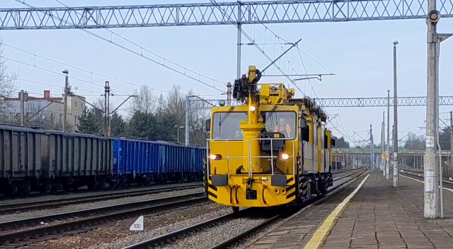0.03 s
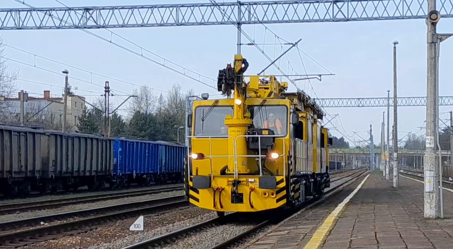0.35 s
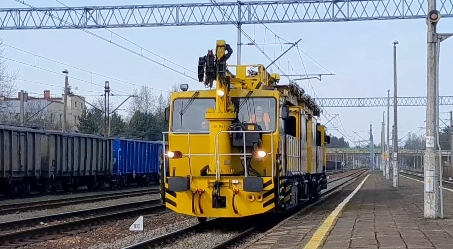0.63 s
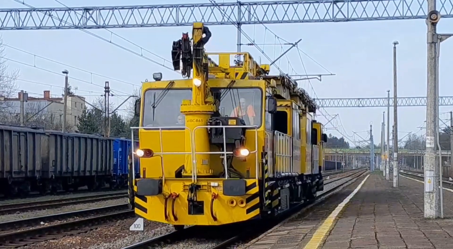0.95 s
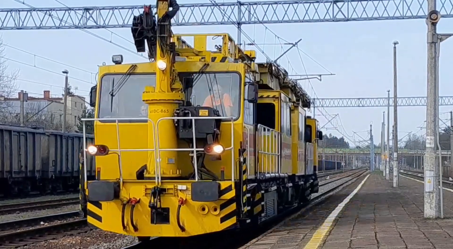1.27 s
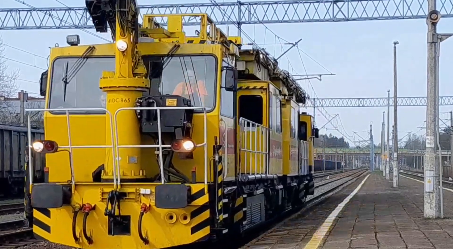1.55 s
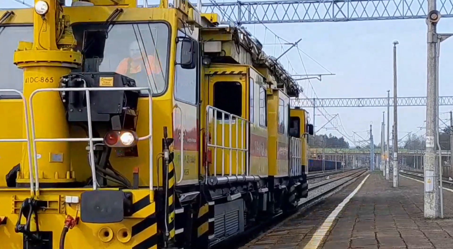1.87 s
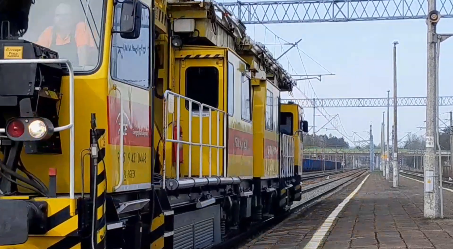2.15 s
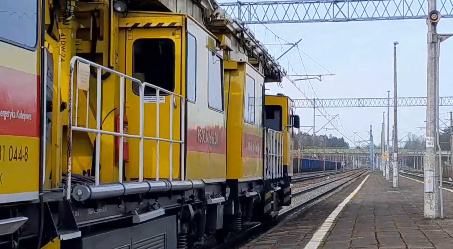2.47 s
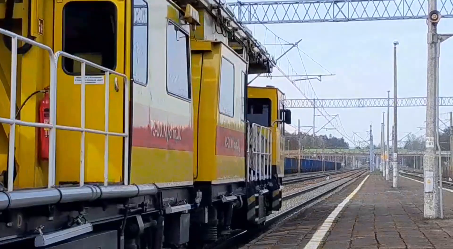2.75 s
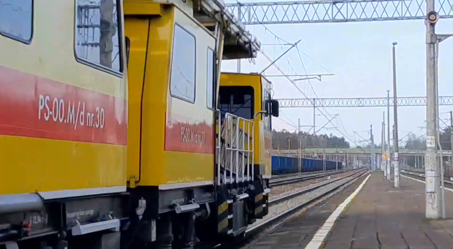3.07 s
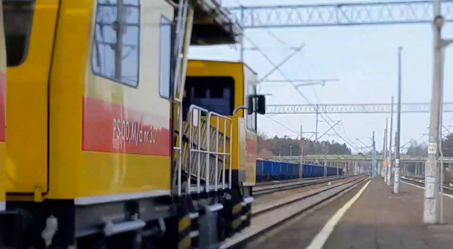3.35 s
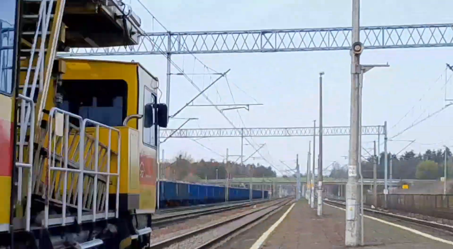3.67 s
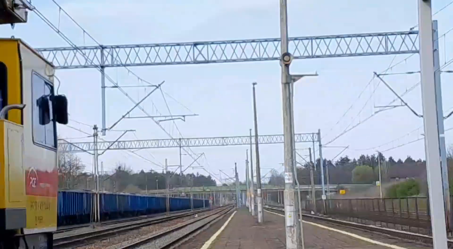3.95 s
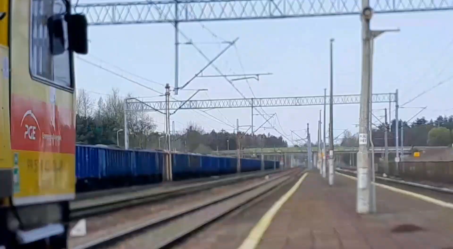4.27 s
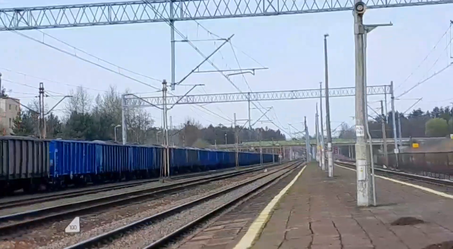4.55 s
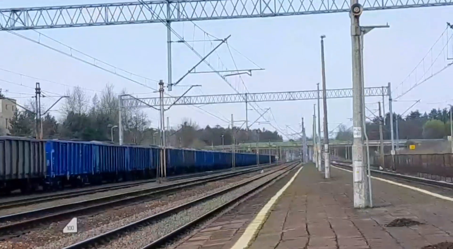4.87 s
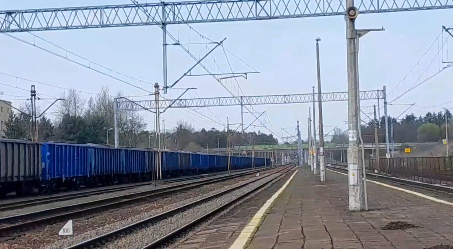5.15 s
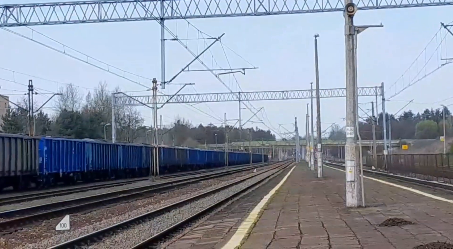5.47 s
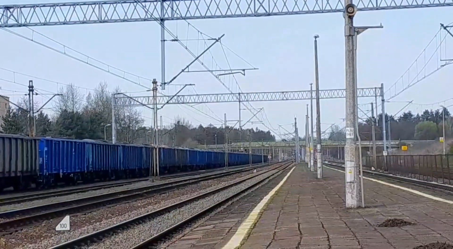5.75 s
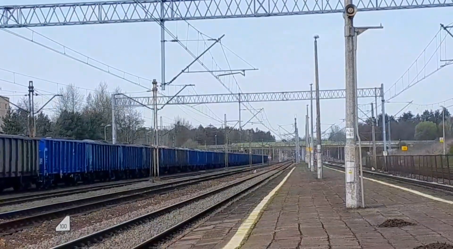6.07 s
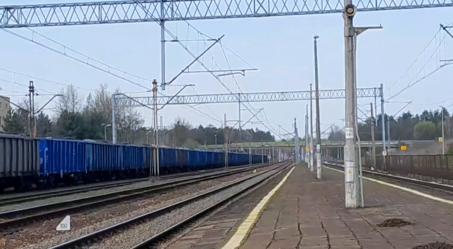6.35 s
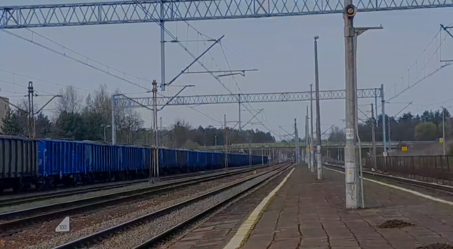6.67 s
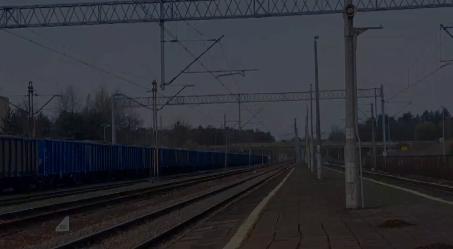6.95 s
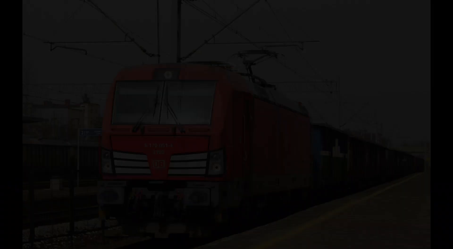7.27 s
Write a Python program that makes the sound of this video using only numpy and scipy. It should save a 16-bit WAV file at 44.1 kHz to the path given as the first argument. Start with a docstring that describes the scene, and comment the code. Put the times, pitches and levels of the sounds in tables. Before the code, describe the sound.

Heard from a platform in a light breeze, a small diesel rail vehicle rolls closer with a low drone, steel hiss and regular wheel thuds. The sound swells as it goes by a few metres away, rattling and scraping, and dragged air thumps against the microphone. Its rear wheels clank and ring sharply, falling in pitch. Softer clanks, engine drone and gusts continue until the sound cuts off.

```python
"""Station platform, a stereo microphone 4.67 m from the track, a light breeze. A diesel rail maintenance
vehicle approaches, its engine droning over the rumble and hiss of steel on steel; worn treads clank and
thump at every turn. The noise swells as the front axle passes at 2.7 s, a flange rubs, and the slipstream
buffets the microphone ports. The rear axle follows at 4.7 s, its wheels ringing and dropping in pitch.
The vehicle rolls on, engine still droning, until the sound stops abruptly at 7.2 s."""
import sys
import numpy as np
from scipy import signal
from scipy.fft import rfft, irfft, next_fast_len
from scipy.io import wavfile
from scipy.ndimage import uniform_filter1d, map_coordinates

SR = 44100
rng = np.random.default_rng(int(sys.argv[2]) if len(sys.argv) > 2 else 0)


def log_audio(samples):
    """Write samples as a 16-bit WAV file to the path given in sys.argv[1]."""
    # one column per channel
    frames = np.atleast_2d(samples).T
    # limit to full scale, then quantise
    limited = np.clip(frames, -1, 1)
    pcm = np.round(limited * 32767).astype(np.int16)
    wavfile.write(sys.argv[1], SR, pcm)


N = 326781

SPEED_M_PER_S, DISTANCE_M = 6.73, 4.67  # of the vehicle; from the microphone to the track
FRONT_S, REAR_S = 2.71, 4.73  # each axle is level with the microphone

# Levels in all tables are relative.
# A worn patch of tread meets the rail about once per turn, and often lands again more softly:
# t/s, scrape level/dB, clank level/dB, ring level/dB, ring centre f/Hz, ring t60/s
TREAD_HITS = [(0.494, -41, -35.5, -45, 2360, 0.54), (1.062, -33, -32, -41, 2300, 0.39),
              (1.135, -36, -30, -47, 2900, 0.33), (1.578, -35.5, -38, -44, 3480, 0.5),
              (1.686, -34.5, -28.5, -36, 3580, 0.12), (1.749, -48, -33, -46, 1750, .1),
              (1.83, -29.5, -33, -43.5, 4200, 0.47), (2.307, -26.5, -33, -45, 4870, .3),
              (2.37, -30, -27.5, -36.5, 4270, 0.15), (2.524, -40.5, -27, -27, 1730, 0.09),
              (2.781, -47, -36, -29.5, 1660, 0.12), (4.508, -21, -27.5, -40, 3300, 0.16),
              (4.593, -26, -44, -44, 3400, 0.1), (4.768, -14.5, -23.5, -22.5, 3600, 0.18),
              (4.85, -23.5, -24, -33.5, 3200, 0.64), (5.031, -12.5, -22, -22.5, 2900, 0.31),
              (5.1, -25.5, -33, -30, 2370, 0.54), (5.135, -27, -32, -32, 5100, 0.2),
              (5.171, -35, -45.5, -22.5, 3270, 0.077), (5.301, -16, -23, -28.5, 3580, 0.49),
              (5.389, -24.5, -28.5, -29.5, 4200, 0.33), (5.528, -39, -44, -40, 3318, 0.34),
              (5.577, -18, -25, -43, 5705, 0.56), (5.662, -29.5, -34, -37.5, 5400, 0.27),
              (5.859, -27.5, -29.5, -40.5, 5500, 0.46), (6.015, -42, -48, -39.5, 5230, 0.13),
              (6.135, -31.5, -32.5, -41, 3260, 0.33), (6.225, -35, -34, -51, 5200, 0.27),
              (6.411, -30.5, -33.5, -39, 5440, 0.27), (6.508, -39.5, -40, -50, 5040, 0.27),
              (6.683, -35, -32.5, -41, 1870, 0.41), (6.962, -31, -32, -42, 1990, 0.6)]
SNAP_SPECTRUM = [(900, -15.5), (1800, 2.5), (3000, -0.5), (6300, -1.5), (7500, -10.5), (12000, -14),
                 (15800, -16)]  # loose fittings and grit: f/Hz, level/dB
# How alike the two microphone ports hear a noise: f/Hz, left-right correlation
GENERAL_LIKENESS = [(30, 0.56), (80, 0.99), (200, 0.98), (450, 1), (1000, 0.46), (2500, 0.44), (6000, 0),
                    (15000, 0.1)]  # rolling noise, ticks and background
WIDE_LIKENESS = [(900, 0.55), (2500, 0.18), (5000, 0), (15000, 0)]  # airy hiss and flange scrape: the treble is unrelated in the two ports
NEAR_LIKENESS = [(60, 0.73), (400, 0.71), (3000, 0.76), (12000, 0.38)]  # the near wheels
WIND_LIKENESS = [(60, 0.18), (400, 0.0047)]  # air striking the ports


def amp(db):
    """Decibels to gain."""
    return 10 ** (np.asarray(db) / 20)


def unit(x):
    """Scale to rms 1."""
    return x / np.sqrt(np.mean(x ** 2) + 1e-20)


def clock():
    """The time of every sample, in seconds."""
    return np.arange(N) / SR


def at_frequency(points, hz):
    """Read rows of f/Hz, value on a log frequency axis."""
    point_hz, values = np.transpose(points)
    return np.interp(np.log(hz + 1), np.log(point_hz + 1), values)


def curves(rows):
    """One value per sample for each column after the time."""
    times, *columns = np.transpose(rows)
    return [np.interp(clock(), times, column) for column in columns]


def wobble(rate, oversample=6):
    """A smooth random curve with rate knots a second."""
    count = int(N * rate / SR) + 4
    fine = signal.resample(rng.standard_normal(count), count * oversample)
    return np.interp(clock() * rate * oversample, np.arange(len(fine)), fine)


def filtered(x, response):
    """Filter x by a gain given as a function of frequency."""
    size = next_fast_len(N + SR // 4)
    return irfft(rfft(x, size) * response(np.fft.rfftfreq(size, 1 / SR)), size)[..., :N]


def rush(spectrum, likeness, drive=1):
    """Stereo noise of rms 1, its strength varied by drive before the spectrum colours it."""
    def response(hz):
        spread = np.arccos(np.clip(at_frequency(likeness, hz), -1, 1)) / 2
        outside = np.maximum(np.maximum(spectrum[0][0] / (hz + 1), hz / spectrum[-1][0]), 1)
        return amp(at_frequency(spectrum, hz)) / outside ** 4 * [np.cos(spread), np.sin(spread)]
    mid, side = filtered(rng.standard_normal((2, N)) * drive, response)
    return unit(np.array([mid + side, mid - side]))


def patchy(x, depth_db, size=1024):
    """Narrow bands swell and fade at random, as different modes of the metal are excited."""
    bands = signal.stft(x, nperseg=size)[2]
    field = uniform_filter1d(rng.standard_normal(bands.shape[1:]), size=3, axis=0)
    field = uniform_filter1d(field, size=12, axis=1)
    return unit(signal.istft(bands * amp(depth_db * unit(field)), nperseg=size)[1][:, :N])


def singing(modes):
    """Noise of rms 1 in narrow resonances, mostly alike in both ports."""
    def response(f):
        return np.sqrt(sum(amp(db) ** 2 / (1 + ((f - hz) / width) ** 2) ** 2 for hz, width, db in modes))
    drive = rng.standard_normal(N) + 0.57 * rng.standard_normal((2, N))
    return unit(filtered(drive, response))


def blow(t, db, t60, attack_s):
    """The envelope of one blow, which rises quickly and dies away."""
    return amp(db - 60 * t / t60) * (1 - np.exp(-t / attack_s))


def bursts(times, levels_db, t60, attack_s):
    """The joint envelope of many blows, added in power."""
    power, t = np.zeros(N + SR), np.arange(SR) / SR
    for s, db, decay_s in zip(times, levels_db, np.broadcast_to(t60, len(times))):
        power[max(round(s * SR), 0):][:SR] += blow(t, db, decay_s, attack_s) ** 2
    return np.sqrt(power[:N])


def swells(rows):
    """The joint envelope of bell-shaped swells."""
    return np.sqrt(sum(amp(db) ** 2 * np.exp(-((clock() - s) / half_s) ** 2) for s, half_s, db in rows))


def passed(middle_s=3.9, turn_s=0.5):
    """Rises from 0 to 1 around middle_s, by default as the middle of the vehicle goes by."""
    return (1 + np.tanh((clock() - middle_s) / turn_s)) / 2


def going_by(pass_s, db, coming_db, leaving_db):
    """Gain of a passing source: db when nearest, less coming_db or leaving_db per doubled distance."""
    along_m = SPEED_M_PER_S * (clock() - pass_s)
    doublings = np.log2(np.hypot(along_m, DISTANCE_M) / DISTANCE_M)
    return amp(db - doublings * np.where(along_m < 0, coming_db, leaving_db))


def both_axles(front_db, rear_db, coming_db, leaving_db):
    """Joint gain of a noise that both axles make as they go by."""
    return np.hypot(going_by(FRONT_S, front_db, coming_db, leaving_db),
                    going_by(REAR_S, rear_db, coming_db, leaving_db))


def placed(pair, lead_ms):
    """Give a sound its bearing: it reaches the left port lead_ms before the right."""
    shift = lead_ms * SR / 2000
    return np.array([map_coordinates(x, [np.arange(N) + way * shift], order=3)
                     for x, way in zip(pair, (1, -1))])


def station(level_db=-48):
    """The steady, distant background of the open station."""
    spectrum = [(40, -1.5), (200, -5.5), (1800, -7), (2800, -14.5), (5000, -14), (7500, -20.5),
                (15000, -35)]  # f/Hz, level/dB
    return amp(level_db) * rush(spectrum, GENERAL_LIKENESS)


def engine(level_db=-2.0, flutter_db=2, jitter=0.0069, throb_db=2.5):
    """Slightly unsteady exhaust partials, whose balance changes from front to rear."""
    firing = [(0, 38.37), (2.7, 38.97), (3.6, 37.87), (4.3, 37.93), (4.8, 37.02), (5.3, 35.83), (6, 36.17),
              (7.2, 35.95)]  # firing rate, lowered by the Doppler shift as it passes: t/s, f/Hz
    drone = [(0, -48.5), (1.1, -43), (2.0, -32), (2.6, -28), (3.4, -27), (4.1, -29.5), (5.2, -28.5),
             (5.8, -29), (6.5, -27.5), (6.97, -21.5), (7.2, -19.5)]  # the engine at the microphone: t/s, level/dB
    partials = [(2, 3.5, -3), (3, -0.5, -11), (4, -20, -15), (5.27, -19, -10), (6, -38, -19.5),
                (8.66, -4.5, -32), (11.3, -32, -24), (12.3, -8.5, -26)]  # multiple of the firing rate, level/dB approaching, level/dB leaving
    (firing_hz,), (drone_db,), gone = curves(firing), curves(drone), passed()
    phase = 2 * np.pi * np.cumsum(firing_hz * (1 + jitter * wobble(14))) / SR
    tone = np.zeros(N)
    for multiple, front_db, rear_db in partials:
        gain = amp(front_db + (rear_db - front_db) * gone + flutter_db * wobble(13))
        tone += gain * np.sin(multiple * phase + 0.16 * wobble(31))
    return amp(drone_db + level_db + throb_db * wobble(7)) * unit(tone)


def rolling(airy_peak_s=4.63):
    """Rough steel on steel shakes the chassis, roars in the wheels and hisses along the rail."""
    rumble_ahead = [(18, -64), (30, -42), (52, -6), (70, -1), (86, -2.5), (102, -1.5), (188, -7), (237, -9),
                    (278, -13.5), (330, -9), (430, -35.5), (730, -120)]  # chassis, heard from ahead: f/Hz, level/dB
    rumble_behind = [(18, -51), (30, -40), (53, -9.5), (70, -3), (82, -10), (97, -10.5), (123, -9.5),
                     (160, -12), (194, -5.5), (330, -29.5), (430, -50.5), (730, -120)]  # chassis, heard from behind: f/Hz, level/dB
    wheel_roar = [(150, -15.5), (250, 0.5), (287, -8.5), (344, -3), (373, -4), (405, -2), (432, -5),
                  (610, -8.5), (910, -13.5), (1310, -20.5), (1740, -19), (2200, -24), (2860, -46),
                  (4840, -120)]  # f/Hz, level/dB
    rail_hiss = [(900, -18), (1400, -8), (1800, 1), (2100, -2), (2380, 4.5), (2700, -0.5), (3300, -0.5),
                 (3900, -4), (5200, -3), (6600, -21), (7300, -21.5), (10000, -25.5)]  # f/Hz, level/dB
    airy_hiss = [(3000, -27), (5800, 0.5), (6600, 7.5), (7300, -13), (9000, -9), (12000, -4.5),
                 (15800, -10.5)]  # a separate fine, high hiss, loudest as the rear passes: f/Hz, level/dB
    rumble = both_axles(front_db=-25, rear_db=-25, coming_db=9, leaving_db=9.5)
    roar = both_axles(front_db=-26, rear_db=-27.5, coming_db=8.5, leaving_db=9.5)
    hiss = both_axles(front_db=-38.5, rear_db=-37, coming_db=8.5, leaving_db=12.5)
    airy = np.hypot(going_by(airy_peak_s, db=-43.5, coming_db=24, leaving_db=16.5),
                    going_by(FRONT_S, db=-53, coming_db=6.5, leaving_db=44.5))
    load, flicker = wobble(18), amp(1.9 * wobble(900) + 1.3 * wobble(25))
    shake = np.sqrt(1 - passed()) * rush(rumble_ahead, GENERAL_LIKENESS)
    shake += np.sqrt(passed()) * rush(rumble_behind, GENERAL_LIKENESS)
    chassis = rumble * amp(2.0 * load) * shake
    contact = rush(wheel_roar, GENERAL_LIKENESS, amp(1.27 * wobble(120)))
    wheels = roar * amp(1.95 * load) * patchy(contact, depth_db=3.0)
    rail = hiss * amp(1.3 * wobble(40)) * patchy(rush(rail_hiss, GENERAL_LIKENESS), depth_db=2.5)
    return chassis + wheels + rail + airy * rush(airy_hiss, WIDE_LIKENESS, flicker)


def over_ground(x, dip_hz=225, width_hz=55, depth=0.64, near_s=1.92):
    """While the vehicle is still far off, the ground reflection partly cancels a band of its rumble."""
    far = 1 - passed(near_s, turn_s=0.48)
    return x - depth * far * filtered(x, lambda hz: np.exp(-((hz - dip_hz) / width_hz) ** 2))


def whine(loudest_s=1.79, waver_db=2.5):
    """Drive and rails sing unsteadily ahead of the vehicle and fade once its nose is by."""
    modes = [(411, 22, -3.5), (467, 70, -3.5), (907, 44, -5), (1660, 96, -21), (2344, 95, -10.5)]  # resonances: f/Hz, width/Hz, level/dB
    return going_by(loudest_s, db=-36.5, coming_db=7.5, leaving_db=5) * patchy(singing(modes), waver_db)


def rattle(loudest_s=2.65, snaps_per_s=24, range_db=14):
    """Loose fittings on the running gear chatter in small, irregular snaps."""
    when, size = rng.random((int(snaps_per_s * N / SR), 2)).T
    snaps = unit(bursts(when * N / SR, range_db * size, t60=0.09, attack_s=0.0015))
    gain = going_by(loudest_s, db=-47.5, coming_db=7.5, leaving_db=4)
    return gain * snaps * rush(SNAP_SPECTRUM, NEAR_LIKENESS, amp(2.5 * wobble(1000)))


def wind_on_ports(lull_db=-44.5, lumps_db=3.0):
    """Breeze and slipstream hit each port separately: slow buffets and lumps of a few milliseconds."""
    gusts = [(0.02, 0.063, -37), (0.45, 0.27, -38), (5.65, 0.21, -35.5), (6.4, 0.2, -32), (6.9, 0.23, -27)]  # swells of the breeze: peak t/s, half length/s, level/dB
    buffet_spectrum = [(20, -12), (40, 1), (65, 0), (130, 5.5), (220, -5.5), (400, -14.5)]  # f/Hz, level/dB
    flutter_spectrum = [(130, -1), (250, 2.5), (400, 2.5), (600, -3.5), (1000, -12.5), (1500, -18.5),
                        (2400, -29.5), (5000, -33.5)]  # f/Hz, level/dB
    dragged, breeze = slipstream(), np.hypot(amp(lull_db), swells(gusts))
    buffet_gain = np.hypot(amp(-6) * dragged, amp(-1) * breeze)
    flutter_gain = np.hypot(amp(-2) * dragged, amp(-11) * breeze)
    surges = amp(2.0 * np.array([wobble(30), wobble(23)]))
    buffet = buffet_gain * rush(buffet_spectrum, WIND_LIKENESS, surges)
    lumps = amp(lumps_db * np.array([wobble(160), wobble(120)]) + 2.06 * wobble(35))
    return buffet + flutter_gain * rush(flutter_spectrum, WIND_LIKENESS, lumps)


def treads(scrape_gain_db=-3.5, clank_gain_db=-1):
    """Each worn patch scrapes the rail and clanks the frame."""
    scrape_spectrum = [(2000, -32.5), (2900, -2), (3300, 4.5), (3750, -1.5), (4300, -2), (4750, -3.5),
                       (5100, -2.5), (6500, -3), (7300, -15.5), (9500, -15.5), (11500, -13.5), (15800, -24)]  # tread on rail: f/Hz, level/dB
    clank_spectrum = [(200, -21.5), (450, 5.5), (750, -0.5), (1200, -2.5), (1690, 1), (2050, -6), (2350, 0),
                      (2700, -9), (3050, -2), (3700, -25)]  # the frame: f/Hz, level/dB
    times, scrape_db, clank_db = np.transpose(TREAD_HITS)[:3]
    scrape = patchy(rush(scrape_spectrum, NEAR_LIKENESS, amp(2.2 * wobble(700))), depth_db=2.8)
    scrape *= bursts(times - 0.003, scrape_db + scrape_gain_db, t60=0.24, attack_s=0.006)
    clank = patchy(rush(clank_spectrum, NEAR_LIKENESS), depth_db=2.8)
    clank *= bursts(times, clank_db + clank_gain_db, t60=0.2, attack_s=0.004)
    return scrape + clank


def wheel_ring(level_db=2, ring_octaves=0.48, scatter_db=2.0, port_spread_rad=0.45, doppler_share=0.065):
    """Each clank rings the wheel modes near its pitch; the tones drop as the wheel goes by."""
    modes = [(1660, 90, 0), (1790, 90, -3), (2340, 35, 2), (2420, 60, -5), (3110, 35, -3), (3284, 20, 3),
             (3398, 35, -5), (3937, 40, -6), (4140, 25, 0), (4346, 30, -1), (4753, 40, -10), (5008, 25, -2),
             (5143, 35, -5), (5480, 90, -7), (5873, 40, -7), (6025, 40, -9), (6380, 90, -6)]  # resonances of the steel wheels: f/Hz, width/Hz, level/dB
    hz, widths, mode_db = np.transpose(modes)
    doppler = 1 + doppler_share * (1 - passed(middle_s=4.87, turn_s=0.11))
    pitch = hz[:, None] * doppler + np.array([0.7 * width * wobble(4 * width) for width in widths])
    roughness = np.array([unit(amp(2.8 * wobble(110))) for _ in hz])  # from the rolling contact
    tones = roughness * np.exp(2j * np.pi * np.cumsum(pitch, axis=1) / SR)
    out = np.zeros((2, N))
    for s, _, _, db, centre_hz, t60 in TREAD_HITS:
        size, start, apart = rng.standard_normal((3, len(hz)))
        weight = amp(mode_db + scatter_db * size) / (1 + (np.log2(hz / centre_hz) / ring_octaves) ** 2)
        phases = np.pi * start + port_spread_rad * np.array([apart, -apart])
        ports = weight / np.linalg.norm(weight) * np.exp(1j * phases)
        ring = np.sqrt(2) * (ports @ tones[:, round(s * SR):][:, :SR]).real
        t = np.arange(ring.shape[1]) / SR
        out[:, round(s * SR):][:, :SR] += blow(t, db + level_db, t60, attack_s=0.0042) * ring
    return out


def thuds(boom_hz=72.1, boom_t60_s=0.33, scatter_db=2.5, detune=0.072):
    """Out-of-round wheels land once per turn: the body booms on its springs, the underframe knocks."""
    landings = [(0.54, -23, -32, 0.016), (0.789, -32, -28, .02), (1.07, -26, -29, .02),
                (1.312, -24.5, -38, .02), (1.569, -21, -29, .02), (1.814, -18.5, -28, 0.018),
                (2.07, -17, -17, .025), (2.336, -17, -20, 0.017), (2.571, -8, -18, 0.023),
                (2.805, -12, -10, 0.029), (3.091, -14.5, -6, 0.025), (4.504, -22, -16, .008),
                (4.762, -20, -10, 0.0072), (5.028, -13, -7.5, 0.0051), (5.299, -13.5, -16, .008),
                (5.576, -13.5, -14.5, .01), (5.857, -20.5, -29, 0.0048), (6.139, -17.5, -20.5, 0.0066),
                (6.42, -22.5, -30.5, 0.0069), (6.686, -19.5, -28, 0.01), (6.958, -15, -19, 0.012)]  # front pair, then rear: t/s, boom level/dB, knock level/dB, rise/s
    underframe = [(111, -7, 0.24), (150.6, -5.5, 0.15), (201.8, -4.5, 0.15), (294.6, -4.5, 0.14),
                  (406.7, -10, 0.16), (539.7, -11.5, 0.14)]  # well damped modes: f/Hz, level/dB, t60/s
    out, t = np.zeros(N + SR), np.arange(SR // 2) / SR
    for s, boom_db, knock_db, rise_s in landings:
        knock = np.zeros(len(t))
        for hz, mode_db, t60 in underframe:
            polarity, size, mistune = rng.standard_normal(3)
            fade = blow(t, knock_db + mode_db + scatter_db * size, t60, rise_s)
            knock += np.sign(polarity) * fade * np.sin(2 * np.pi * hz * (1 + detune * mistune) * t)
        bounce_hz = boom_hz * (1 + detune / 2 * rng.standard_normal())
        boom = blow(t, boom_db, boom_t60_s, rise_s) * np.sin(2 * np.pi * bounce_hz * t)
        out[round(s * SR):][:len(t)] += boom + knock
    return out[:N]


def ticks(rattle_db=-4, crack_db=-11):
    """Loose fittings and grit snap briefly, with a short rattle after the crack."""
    snaps = [(0.939, -40, 0.16), (1.01, -35, .08), (1.059, -30.5, 0.13), (2.212, -29, 0.17),
             (2.471, -36, .12), (2.731, -29.5, .15), (2.879, -33, 0.23), (2.95, -30.5, .15),
             (2.993, -26.5, 0.18), (3.055, -30, .15), (3.259, -28, 0.064), (3.561, -35, 0.16),
             (3.985, -33, 0.1), (4.137, -41, .08), (4.251, -30.5, 0.12), (4.297, -38.5, .08)]  # from the running gear: t/s, level/dB, t60/s
    times, db, t60 = np.transpose(snaps)
    tail = bursts(times, db + rattle_db, t60, attack_s=0.00066)
    crack = bursts(times, db + crack_db, t60=0.014, attack_s=0.00036)
    return (crack + tail) * rush(SNAP_SPECTRUM, GENERAL_LIKENESS, amp(1.3 * wobble(400)))


def flange(groan_db=4.5):
    """A flange slides along the rail head in a smooth, scraping swell, and the chassis groans with it."""
    rubs = [(3.04, 0.13, -30), (5.1, 0.061, -29.5)]  # peak t/s, half length/s, level/dB
    spectrum = [(900, 4.5), (1400, -3), (1800, 1), (2400, 3.5), (3200, 0.5), (4000, -6), (5200, -3.5),
                (6500, -15), (7300, -18), (11000, -23.5), (15800, -31.5)]  # the scrape: f/Hz, level/dB
    chassis_modes = [(160, 25, -3), (231, 11, -0.5), (358, 39, -10)]  # f/Hz, width/Hz, level/dB
    scrape = patchy(rush(spectrum, WIDE_LIKENESS), depth_db=5.5)
    return swells(rubs) * (scrape + amp(groan_db) * singing(chassis_modes))


def slipstream(peak_s=3.42, sag_s=0.36, end_s=5.27, steady_db=-25.5, excess_db=10):
    """Strength of the dragged air: it peaks, sags to a draught beside the body and dies away behind."""
    since_peak = clock() - peak_s
    rise_db = 52.5 * np.minimum(since_peak, 0)  # slope in dB/s, as for the fall
    sag_db = excess_db * np.exp(-np.maximum(since_peak, 0) / sag_s)
    fall_db = 31 * np.maximum(clock() - end_s, 0)
    return amp(steady_db + sag_db + rise_db - fall_db)


def bow_wave():
    """The body shoves a slow swell of air over the ports."""
    push = [(3.55, .13, -29)]  # peak t/s, half length/s, level/dB
    spectrum = [(20, -14), (40, 4), (60, -2.5), (110, -15)]  # f/Hz, level/dB
    return swells(push) * rush(spectrum, WIND_LIKENESS)


def eddies(level_db=2, body_hz=(150, 600)):
    """Single eddies thump each port differently; the smaller the eddy, the brighter its thump."""
    strikes = [(3.353, -7.5, 500, 0.071), (3.399, -4, 690, 0.024), (3.431, -14, 600, 0.041),
               (3.459, -7.5, 794, 0.055), (3.474, -10.5, 1480, 0.073), (3.499, -3.5, 593, 0.066),
               (3.521, -1, 1200, 0.03), (3.543, -1, 1700, 0.029), (3.563, -3.5, 650, 0.034),
               (3.609, -8.5, 586, 0.048), (3.652, -8, 740, 0.046), (3.683, -4.5, 1560, 0.042),
               (3.726, -6, 900, 0.027), (3.76, -9, 690, 0.095), (3.804, -7, 452, 0.044),
               (3.821, -11, 790, 0.11), (3.859, -5.5, 750, 0.034), (3.94, -10, 540, 0.041),
               (3.974, -12.5, 353, 0.1), (4.007, -3.5, 1000, 0.019), (4.085, -9, 595, 0.041),
               (4.109, -9.5, 794, 0.031), (4.186, -14, 800, 0.1), (5.105, -5.5, 680, 0.044),
               (6.835, -15.5, 493, 0.057), (7.198, -24.5, 1200, .06)]  # the hardest eddies: t/s, level/dB, low-pass f/Hz, t60/s
    out, t = np.zeros((2, N + SR)), np.arange(SR // 4) / SR
    body = signal.butter(1, body_hz, "band", fs=SR, output="sos")
    for s, db, top_hz, t60 in strikes:
        fade = blow(t, 0, t60, attack_s=0.0031)
        top = signal.butter(5, top_hz, fs=SR, output="sos")
        thump = signal.sosfilt(np.vstack([body, top]), fade * rng.standard_normal((2, len(t))))
        out[:, round(s * SR):][:, :len(t)] += amp(db + level_db) * np.std(fade) * unit(thump)
    return out[:, :N]


def scene():
    """From the platform, vehicle and wheels each shift in bearing while air strikes the microphone."""
    bearing = [(0, 0.14, 0.14), (1, 0.16, 0.19), (2, 0.35, 0.26), (3.1, 0.28, 0.72), (4.0, 0.35, .2),
               (4.5, 0.26, 0.081), (4.8, 0.38, 0.25), (5.07, 0.36, 0.42), (5.3, 0.31, 0.27),
               (5.6, 0.24, 0.18), (6.2, 0.19, 0.14), (7.2, 0.052, 0.097)]  # how much earlier the left port hears: t/s, vehicle/ms, wheels/ms
    vehicle_ms, wheels_ms = curves(bearing)
    vehicle = over_ground(engine() + rolling() + flange() + whine() + rattle())
    wheels = treads() + wheel_ring() + thuds()
    from_track = placed(vehicle, vehicle_ms) + placed(wheels, wheels_ms) + ticks()
    return from_track + bow_wave() + wind_on_ports() + eddies() + station()


def record(dry, stop_s=7.23, top_hz=15900):
    """The right port is a little louder, peaks saturate, and the sound is cut off and band-limited."""
    gate = np.clip((stop_s - clock()) / 0.003, 0, 1)
    ports = dry * gate * amp([[-0.25], [0.25]])
    saturated = ports / (1 + ports ** 4) ** (1 / 4)
    return filtered(saturated, lambda hz: hz < top_hz)


dry = scene()
out = record(dry)
log_audio(out)
```